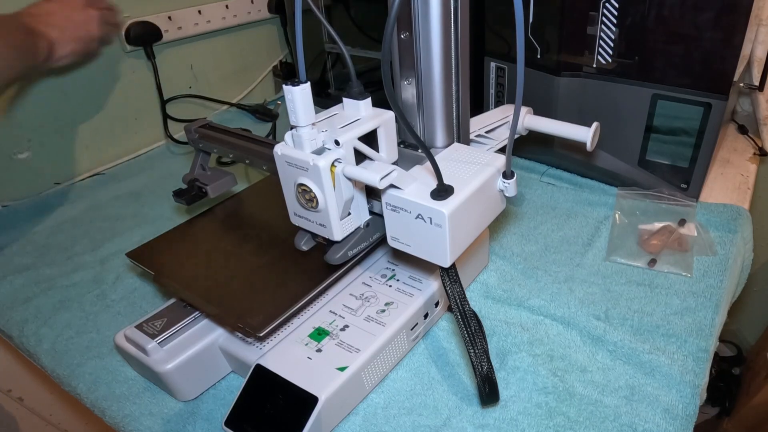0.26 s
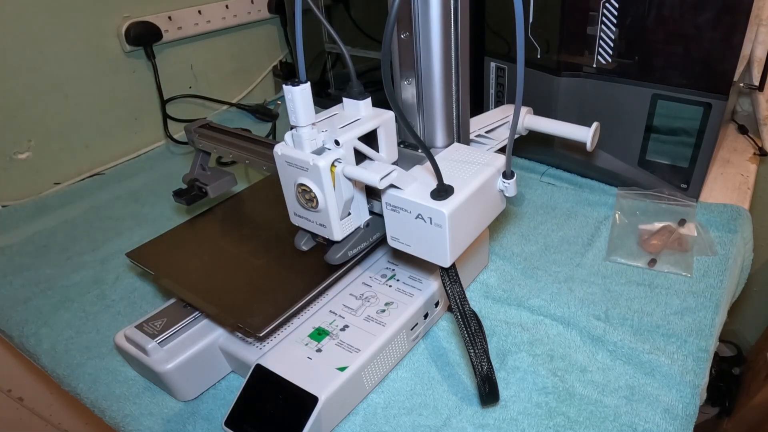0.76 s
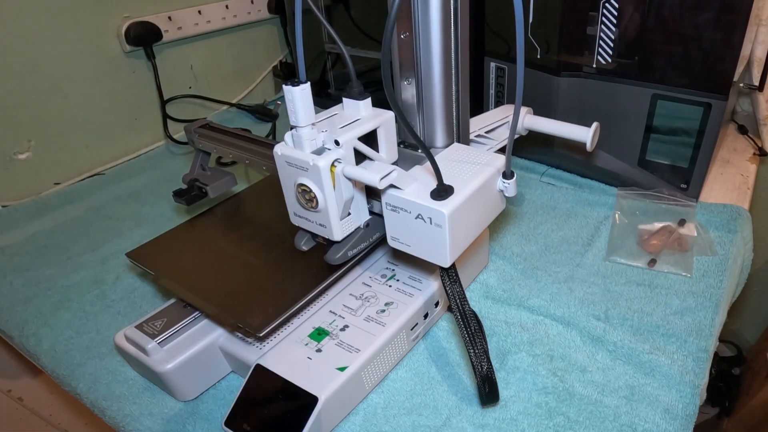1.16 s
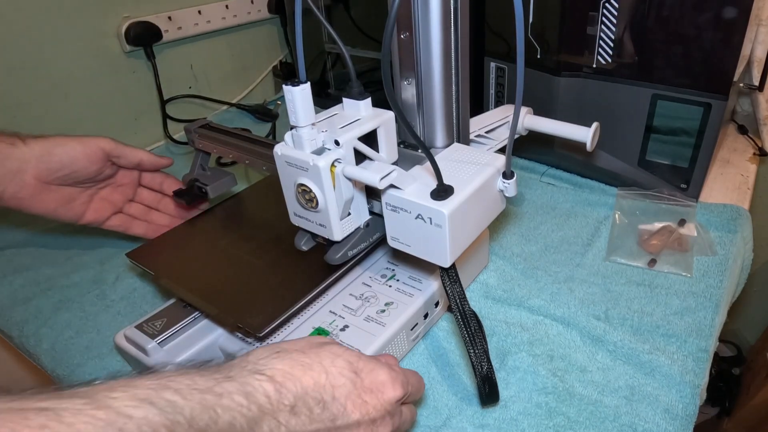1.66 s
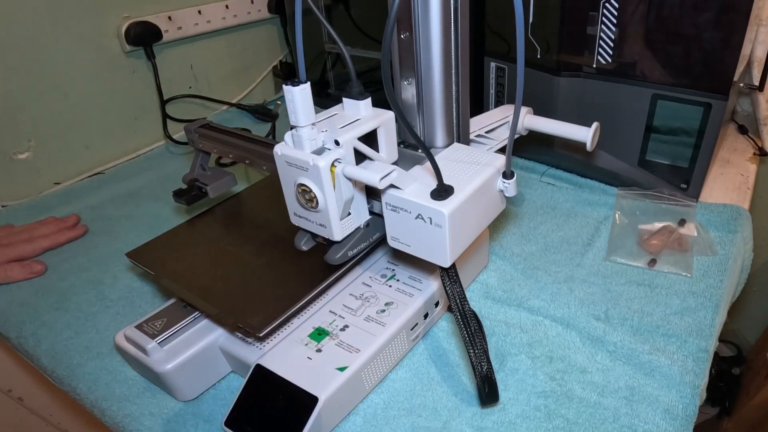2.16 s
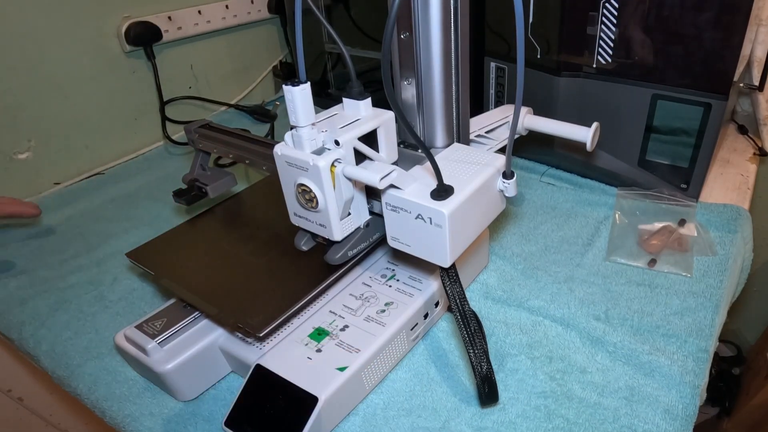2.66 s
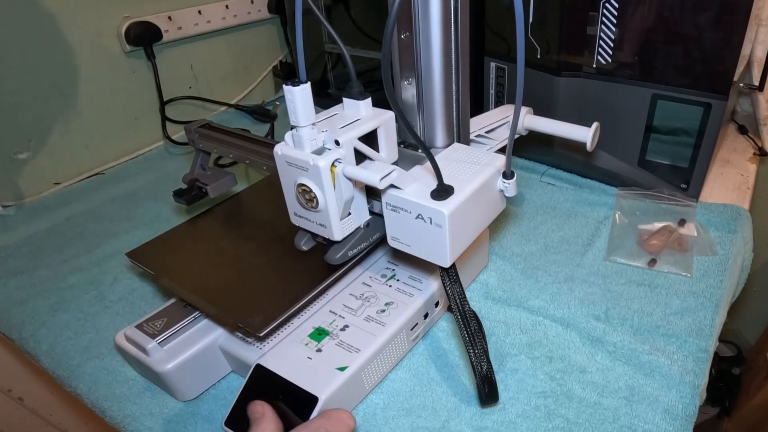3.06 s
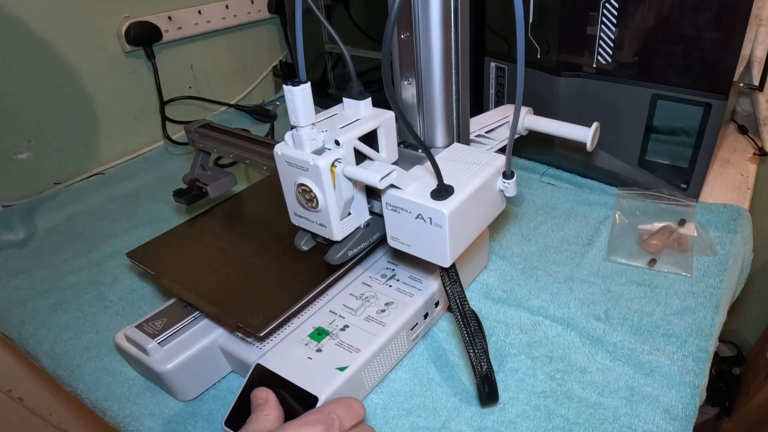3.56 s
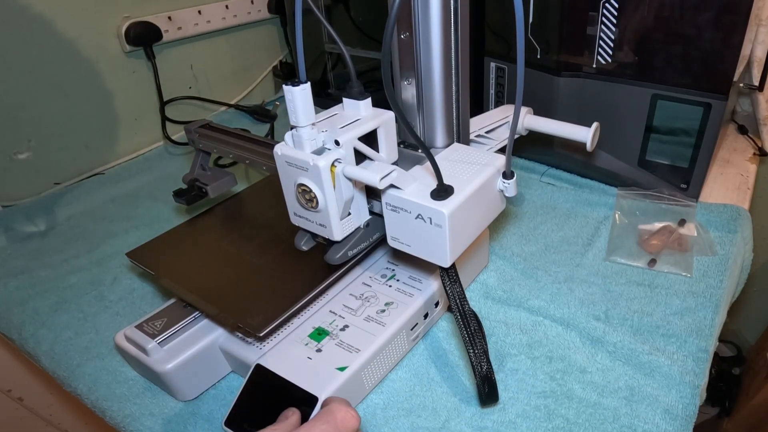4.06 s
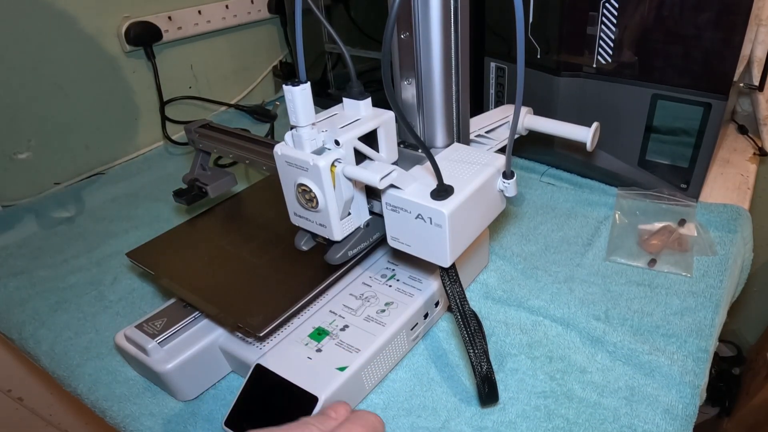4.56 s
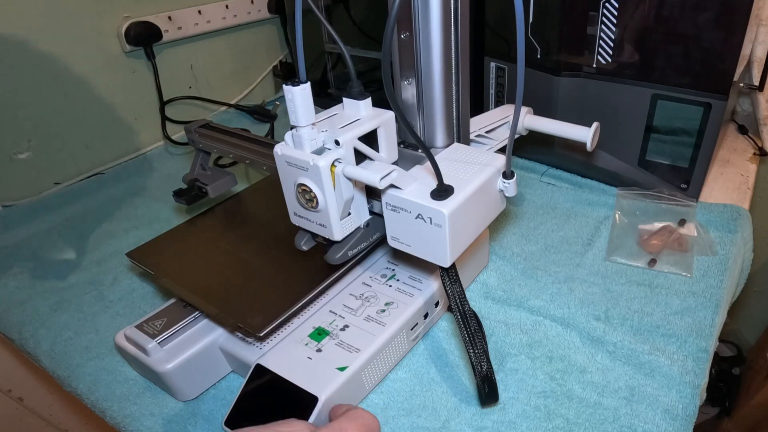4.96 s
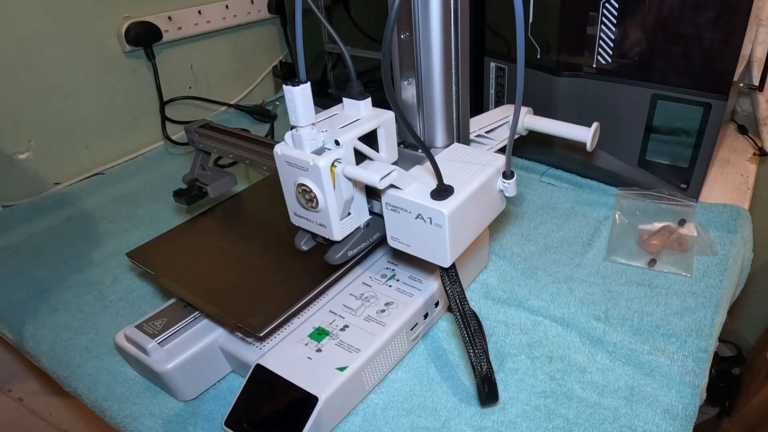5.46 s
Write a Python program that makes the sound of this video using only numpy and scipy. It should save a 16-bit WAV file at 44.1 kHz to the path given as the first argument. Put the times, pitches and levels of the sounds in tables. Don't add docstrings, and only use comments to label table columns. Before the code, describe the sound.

Close stereo sound at a workbench: first a hard metallic-plastic click from the left, fading in a fraction of a second. Then small sleeve rustles, a thin cable scrape and a clattering knock as the cable falls. After two seconds come crisp towel rubs, followed by dull little taps, squeaky skin drags and light scrapes on hollow plastic, over faint low hum.

```python
import sys
import numpy as np
from scipy import signal
from scipy.fft import rfft, irfft, next_fast_len
from scipy.io import wavfile
from scipy.ndimage import uniform_filter1d, map_coordinates

SR = 44100
rng = np.random.default_rng(int(sys.argv[2]) if len(sys.argv) > 2 else 0)


def pcm_store(signal):
    levels = np.round(np.clip(np.atleast_2d(signal), -1, 1) * 32767)
    wavfile.write(sys.argv[1], SR, levels.astype(np.int16).T)


def amplitude_ratio(level_db):
    exponent = np.asarray(level_db, float) / 20
    return 10 ** exponent


N = 251644

# pitch_hz, level_db
MIC_TONE = [(11000, -1), (13500, -2.5), (15000, -4.5), (15600, -7), (15900, -41.5)]
# pitch_hz, level_db
WIDER_TREBLE = [(8000, 0.5), (11000, 3), (14000, 7.5)]
HALVES = np.array([[0.5], [-0.5]])
LEFT_LAG = 1

# pitch_hz, level_db (per Hz)
SNAP_TONE = [(180, -51), (300, -19.5), (975, -17), (1910, -4.5), (3120, -12), (5350, -3.5), (10500, -14),
             (12100, -12), (15000, -34)]
# start_s, pitch_hz, level_db, half_length_s
SPRING_CATCHES = [
    (.0008, 6250, -12, .0005),
    (.0017, 2120, -16, .0011),
    (.0019, 4650, -15, .0007),
    (.0038, 5300, -14.5, .0011),
    (.0043, 7000, -19, .0008),
]
# pitch_hz, level_db (per Hz)
STRIP_TONE = [(160, -37.5), (280, -8.5), (560, -1.5), (813, -12.5), (1250, -0.5), (1360, -11.5), (1460, -5),
              (1720, -6.5), (1900, -1), (2650, -9.5), (3700, -3.5), (9410, -16), (11800, -25), (14200, -33),
              (14500, -41.5), (15400, -60)]
# pitch_hz, fade_s
STRIP_FADE = [(60, 0.6), (180, 0.33), (500, 0.26), (1300, 0.23), (3000, 0.22), (6000, 0.24), (8500, 0.2),
              (10000, 0.16), (12500, 0.18), (14500, 0.16)]
# pitch_hz, level_db, fade_s
STRIP_NOTES = [(186.3, 5, 0.17), (219, -12.5, 0.12), (338, -3, 0.15), (457.5, -7, 0.3), (663.7, -10, .15),
               (992, -10.5, 0.36), (1217, -10, 0.14), (1486, -13.5, 0.24), (1890, -11, .12),
               (2777, -17, 0.25), (3368, -18.5, .2), (6150, -15, .15), (7100, -17.5, .15)]
# pitch_hz, unrelated_share
WALL_SPREAD = [(100, .2), (300, .2), (1000, .33), (3000, 0.54), (5000, .3), (9000, .4), (13000, .45)]
# pitch_hz, left_over_right_db
PLUG_LEFT = [(150, 0.5), (350, 0), (700, 1.5), (8000, 3), (13000, 3.5)]
# pitch_hz, left_lead_radians
PLUG_TURN = [(0, 0), (1200, 0), (2200, -0.14), (3010, -0.84), (4820, -0.14), (7840, -0.3), (8790, 1.5),
             (9040, -0.4), (10400, 1.7), (10900, 0.1), (11300, 2), (12100, -7.6), (12700, -1.4),
             (13400, -4), (13800, -0.05), (15600, 0.17)]

# pitch_hz, level_db (per Hz)
HUM_TONE = [(53, -43), (90, -5.5), (118, -8.5), (135, 0), (156, 8.5), (237, 3), (327, -2), (420, -9),
            (520, -15), (680, -38), (1140, -120)]
# pitch_hz, level_db (per Hz)
SWAY_TONE = [(8, -12), (20, -3), (35, -2), (60, -4.5), (90, -16), (140, -50)]
# pitch_hz, level_db (per Hz)
AIR_TONE = [(210, -23.5), (350, -4), (546, -3.5), (867, -9.5), (1030, -5), (1310, -7), (2050, -16),
            (3250, -20), (4120, -24.5), (5490, -20), (7550, -25), (13000, -38), (15700, -50.5)]
# start_s, low_notes_db, sway_db
WEIGHT_SHIFTS = [(.08, -52, -51), (.22, -58, -64.5), (.55, -90, -64), (0.871, -60, -62), (.93, -63.5, -58),
                 (1.04, -59.5, -69), (1.27, -63.5, -71), (1.34, -67, -79), (1.53, -61, -65.5),
                 (1.84, -66, -73), (2.22, -59.5, -63), (2.42, -79, -79), (2.51, -55, -72), (2.75, -81, -69),
                 (3.11, -66, -63), (3.26, -63, -69), (3.68, -64, -73), (3.8, -60.5, -67),
                 (4.05, -62.5, -93), (4.26, -64, -74), (4.62, -71, -70), (4.97, -63.5, -69.5),
                 (5.08, -68, -69), (5.5, -67.5, -65.5), (5.649, -60, -74.5)]
AIR_DB, HUM_DB, SWAY_REST_DB = -69.5, -67, -80
HUM_LEFT_DB, LEAN_LEFT_DB = -8.5, -3.5
LEAN_HOLD_S = 0.0256
MODES_RISE, MODES_FALL, SWAY_RISE, SWAY_FALL = 200, 174, 120, 230

# start_s, peak_db, pitch_hz
STAND_JOLTS = [(.11, -46, 30), (.86, -62, 40), (.93, -59, 50.3), (1.516, -60, 30), (3.105, -57, 37.6),
               (3.344, -63, 26.8), (3.565, -55.5, 44.8), (3.665, -51, 23.4), (4.603, -55.5, 27),
               (4.65, -56, 70.4), (5.051, -58, 50), (5.158, -60, 42.8)]
JOLT_CYCLES, JOLT_DB = 0.65, -3

# start_s, peak_db, thud_db, rim_db, crack_db
BENCH_KNOCKS = [
    (0.147, -48, -16.5, -7, -22.5),
    (1.0575, -32.5, -12, -18, -16.5),
    (1.071, -43.5, -8.5, -7, -25),
    (1.286, -51, -3.5, -34.5, -19),
    (1.507, -61.5, 6.5, -22.5, -19.5),
    (2.522, -48, 7.5, -8, -16),
    (5.028, -57, 4.5, -23.5, -22),
    (5.533, -41.5, -3.5, -12.5, -30),
    (5.551, -44, -4.5, -22, -33.5),
]
# pitch_hz, width_hz, level_db
BENCH_TOP = [(550, 267, 2.5), (900, 640, 2.5), (1282, 493, 2.5)]
# pitch_hz, width_hz, level_db
BENCH_RIM = [(1690, 560, 13), (2500, 980, 6.5)]
# pitch_hz, width_hz, level_db
LOW_THUD = [(136.7, 18, -0.5), (195.7, 33, 4), (210.5, 42, 3.5), (291.3, 62.5, 0), (442, 91, -5)]
# pitch_hz, level_db, fade_s
PLATE_NOTES = [(586, -7, 0.11), (715, -0.5, 0.11), (894, -3, 0.039), (1060, -19, 0.28), (1320, -29, 0.44),
               (1410, -21, 0.062), (1480, -7, 0.19)]
# pitch_hz, level_db (against the blow), fade_s
ROOM_BOOM = (183, -12.5, 0.43)
PLATE_DB = -15.5
KNOCK_T60_S, HARD_DB, LONGER_S_PER_DB = 0.192, -30.5, 0.03

# start_s, peak_db,
# pitch_hz, crack_db, fade_s
SHORT_TAPS = [(0.147, -42, 2430, -21, 0.04), (.148, -44, 1200, -22, .05), (0.2227, -47, 1490, 3.5, 0.027),
              (0.226, -50, 2700, -7, 0.036), (1.048, -51, 865, -30, .06), (1.0585, -33, 870, -26, 0.044),
              (1.0605, -33.5, 530, -32, 0.056), (1.068, -34, 1160, -40, 0.051),
              (1.073, -29.5, 900, -40, 0.14), (1.084, -40.5, 695, -40, .06), (1.099, -36, 960, -40, 0.063),
              (1.108, -40, 1090, -40, 0.071), (1.113, -44, 720, -40, .08), (1.509, -55, 950, -30, .03),
              (2.79, -69, 532, 6.5, 0.035), (3.002, -52, 1350, -34, 0.035), (3.093, -40, 1040, -23, 0.05),
              (3.0935, -43, 2280, -15, 0.039), (3.094, -46, 4230, -12, .025), (3.135, -38, 840, -23, 0.05),
              (3.1355, -50, 2000, -20, .02), (3.1405, -40, 900, -30, 0.026),
              (3.152, -54.5, 2900, -10, .06), (3.317, -44, 2700, -3, .05), (3.151, -38, 1460, -11, 0.062),
              (3.155, -40, 1430, -20, 0.056), (3.476, -49, 1400, -29.5, 0.031),
              (3.65, -49.5, 990, -5, 0.054), (3.679, -53, 1340, -26, 0.03), (3.696, -50.5, 543, -18, 0.28),
              (3.765, -45.5, 534, -32, 0.15), (3.799, -44, 1430, -2, 0.042),
              (4.077, -50, 1360, -18, 0.086), (4.476, -52, 1430, -21, 0.05),
              (4.591, -47, 1010, -22, 0.075), (4.667, -50.5, 2460, -20, 0.033),
              (4.919, -44, 1440, -7.5, 0.036), (5.017, -40, 950, -4, 0.054),
              (5.018, -43, 2500, -20, 0.058), (5.019, -45, 3730, -10, .05),
              (5.537, -64, 2880, -20.5, 0.12), (4.49, -55, 3200, -20, .08)]
# start_s, peak_db, pitch_hz
SOFT_CATCHES = [(.24, -47, 1100), (1.118, -43, 1040), (1.131, -45, 970), (3.014, -49, 1290),
                (3.021, -52, 1350), (3.033, -51, 1400), (3.04, -47, 1450), (3.053, -48, 1500),
                (3.061, -49, 1010), (3.069, -52, 1350), (3.168, -45, 1400), (3.175, -50, 1400),
                (3.214, -53, 1050), (3.244, -48, 1000), (3.258, -40, 1000), (3.28, -45, 990),
                (3.304, -45, 1300), (3.31, -38, 950), (3.314, -39, 1054), (3.326, -49, 1020),
                (3.345, -52, 1400), (3.159, -49, 1400), (3.181, -47, 1000), (3.199, -45, 950),
                (3.222, -42, 940), (3.234, -47, 930), (3.252, -49, 980), (3.266, -41, 960),
                (3.294, -43, 980), (3.318, -38.5, 980), (3.514, -63, 1290), (3.55, -52, 1460),
                (3.576, -52, 1320), (3.592, -49, 1320), (3.707, -50, 900), (3.72, -54, 1000),
                (3.744, -51, 1060), (3.778, -46, 950), (3.757, -43, 970), (3.77, -40, 990),
                (3.805, -47, 1420), (3.822, -47, 1400), (4.287, -54, 1320), (4.326, -59, 1340),
                (4.452, -64, 1130), (4.486, -49, 1450), (4.495, -55, 1400), (4.504, -49, 1410),
                (4.514, -46, 1470), (4.641, -58, 1190), (4.816, -58, 1480), (4.936, -56, 1250),
                (4.956, -50, 1370), (4.989, -53, 1400), (5, -45, 1420)]
# start_s, level_db, pitch_hz, fade_s
CABLE_SQUEAK = (.478, -53, 2420, .11)
CATCH_CRACK_DB, CATCH_T60_S = -30, 0.063
TAP_RISE_S, CATCH_RISE_S = 0.0005, 0.0015

# start_s, hold_s, hiss_db, dull_db, bench_top_db
CLOTH_STROKES = [(0.163, 0.0075, -94, -68, -74), (0.236, 0.024, -71, -60, -61.5),
                 (0.389, 0.015, -64.5, -59.5, -65.5), (0.58, 0.095, -69.5, -68, -73.5),
                 (0.702, 0.18, -77.5, -70.5, -70.5), (0.944, 0.17, -71.5, -65, -68),
                 (1.14, 0.11, -81.5, -75.5, -74), (1.345, 0.17, -81.5, -82.5, -78.5),
                 (1.544, 0.2, -82.5, -73.5, -74), (1.784, 0.13, -74, -65.5, -68.5),
                 (1.94, 0.005, -73, -74, -88), (2.212, 0.025, -53.5, -64, -80.5),
                 (2.241, 0.042, -54.5, -58.5, -60), (2.292, 0.03, -55.5, -61, -63.5),
                 (2.32, 0.024, -53.5, -55.5, -59.5), (2.352, 0.019, -56.5, -57.5, -66),
                 (2.387, 0.025, -79, -65.5, -65.5), (2.456, 0.031, -57, -59.5, -68),
                 (2.497, 0.052, -50, -56.5, -62), (2.551, 0.024, -59, -62, -63),
                 (2.598, 0.032, -60.5, -67, -71.5), (2.792, 0.0058, -85, -97, -96)]
# start_s, hold_s, hiss_db, upper_db, lower_db
CASING_SLIDES = [(3.019, 0.016, -74.5, -59, -82), (3.039, 0.071, -69.5, -63, -67.5),
                 (3.147, 0.021, -65.5, -52.5, -55), (3.19, 0.038, -62.5, -61, -62),
                 (3.246, 0.041, -60, -72, -57.5), (3.304, 0.015, -57, -52.5, -56.5),
                 (3.472, 0.067, -85.5, -71, -91), (3.56, 0.06, -76, -63.5, -77),
                 (3.67, 0.088, -78.5, -64.5, -67), (3.754, 0.022, -57.5, -63, -58),
                 (3.796, 0.009, -65, -56.5, -62), (3.841, 0.035, -68, -81, -88),
                 (4.086, 0.012, -89, -77.5, -72.5), (4.185, 0.21, -92, -76, -80.5),
                 (4.336, 0.05, -75.5, -66.5, -75), (4.47, 0.037, -71, -60, -72.5),
                 (4.597, 0.022, -73, -64.5, -65), (4.619, .025, -66.5, -68, -74),
                 (4.656, 0.017, -65.5, -60.5, -68), (4.806, 0.04, -83.5, -68.5, -90),
                 (4.934, 0.0072, -80, -62.5, -76), (4.96, .03, -75, -58.5, -71),
                 (4.99, 0.011, -67, -54.5, -69), (5.006, 0.0079, -64.5, -55, -56.5),
                 (5.197, 0.38, -86.5, -80, -85), (5.624, .09, -82, -75, -75.5)]
# pitch_hz, level_db (per Hz)
TOWEL_HISS = [(2650, -32), (4500, -2.5), (6200, 0.5), (7670, -0.5), (9760, -8.5), (10400, -13.5),
              (14400, -26.5), (15700, -46.5)]
# pitch_hz, level_db (per Hz)
PLASTIC_HISS = [(2650, -20), (4500, -4), (5400, -1.5), (6800, -4.5), (7430, -3.5), (9500, -9),
                (11100, -17.5), (13800, -26), (15700, -37.5)]
# pitch_hz, level_db (per Hz)
SLEEVE_RUSTLE = [(940, -40), (1600, -7.5), (1820, -2.5), (2030, -3.5), (2220, -3), (2750, -4.5), (3140, -7),
                 (4500, -11.5), (5850, -12.5), (9900, -120)]
# pitch_hz, level_db (per Hz)
DULL_RUB = [(1200, -13), (1800, 2.5), (2600, 3), (4000, 2), (5200, -20), (7000, -42)]
# pitch_hz, width_hz, level_db
PALM_BODY = [(1100, 400, -0.5), (1590, 670, -1.5)]
# pitch_hz, width_hz, level_db
CASING_UPPER = [(1190, 550, -1.2), (1400, 750, -0.98)]
# pitch_hz, width_hz, level_db
CASING_LOWER = [(930, 1860, 0)]
# pitch_hz, width_hz, level_db
CASING_HOLLOW = [(530, 500, 0)]
# pitch_hz, width_hz, level_db
CASING_PANEL = [(950, 510, 0)]
# pitch_hz, width_hz, level_db
CASING_RIBS = [(2600, 200, -5), (3310, 310, 3), (4050, 370, 1), (4920, 360, 3.5), (5600, 320, 0.5),
               (7300, 410, 1.5), (8540, 440, -5), (9450, 700, 1.5)]
REACH_S, TOUCH_S = 2.1, 2.9
STROKE_RISE, STROKE_FALL, SLIDE_RISE, SLIDE_FALL = 500, 330, 470, 344
CASING_RISE, CASING_FALL = 850, 396
IDLE_HISS_DB, IDLE_CASING_DB = -89, -88
SLEEVE_LEFT_DB, PALM_LEFT_DB, FINGER_LEFT_DB, CASING_LEFT_DB = 4.5, 2, 2, -1.5
PALM_LOW_DB = -7
WIDE_UNDER_DB, HOLLOW_UNDER_DB = -3, -7.5
RIBS_DB = -6
DULL_UNDER_DB, DULL_SHARE = -2.5, 0.93
DULL_LAG_S, DULL_FALL = 0.0065, 210
LINGER_DB, LINGER_SHARE = -14.5, 0.39

# start_s, peak_db, pitch_hz, fade_s
BENCH_THUMPS = [(0.22, -52, 520, 0.099), (4.996, -47.5, 331, 0.17), (1.4, -46, 198, 0.14),
                (1.512, -51, 202, 0.08), (1.2, -48, 233, 0.045), (1.3, -42, 285, 0.075),
                (1.318, -49, 165, 0.15), (1.345, -50, 201, 0.095), (3.2, -51, 150, .1), (5.1, -54, 220, .15),
                (2.3, -44, 226, 0.19), (2.526, -57, 440, 0.1), (3.62, -54, 186, 0.17),
                (5.03, -58, 317, 0.16), (5.56, -56, 380, .2)]

# start_s, hold_s, level_db
SKIN_FLICKS = [
    (0.226, .004, -83),
    (2.188, .04, -63),
    (3.553, .04, -86),
    (3.734, 0.047, -62),
    (4.553, 0.0033, -84),
    (4.596, .015, -68.5),
    (4.636, 0.025, -63),
    (4.925, 0.0088, -68),
    (4.964, .025, -79),
]
# pitch_hz, width_hz, level_db
FLICK_SHEEN = [(9000, 1400, 4), (12500, 7200, -7.5)]
FLICK_RISE, FLICK_FALL = 2800, 2500

# start_s, hold_s, level_db
CABLE_DRAGS = [
    (.72, 0.056, -70),
    (.82, 0.073, -73),
    (0.914, 0.11, -67),
]
# pitch_hz, width_hz, level_db
SLACK_RING = [(2000, 110, 0), (2700, 330, -10)]
# start_s, hold_s, level_db
TIGHT_DRAGS = [
    (.97, .08, -69),
]
# pitch_hz, width_hz, level_db
TIGHT_RING = [(2180, 160, -3), (2770, 200, 0)]


def along(points, hz):
    f, v = np.transpose(points)
    return np.interp(np.log(hz + 1), np.log(f + 1), v)


def unit(x):
    return x / np.sqrt(np.mean(x ** 2) + 1e-20)


def wobble(rate):
    knots = rng.standard_normal(int(N * rate / SR) + 4)
    return map_coordinates(knots, [np.arange(N) * rate / SR])


def filtered(x, response):
    m = next_fast_len(x.shape[-1] + 8192)
    spectrum = rfft(x, m) * response(np.fft.rfftfreq(m, 1 / SR))
    return irfft(spectrum, m)[..., :x.shape[-1]]


def shade(points):
    return lambda hz: amplitude_ratio(along(points, hz))


def body(modes):
    def response(f):
        total = 0
        for k, (c, w, db) in enumerate(modes):
            total = total + (-1) ** k * amplitude_ratio(db) * 1j * f * w / (c * c - f * f + 1j * f * w)
        return total
    return response


def steep(modes):
    return lambda hz: body(modes)(hz) ** 2


def tilt(left_over_right_db):
    return amplitude_ratio(left_over_right_db * HALVES)


def late_left(sound):
    return np.array([np.roll(sound[0], LEFT_LAG), sound[1]])


def pair(response, width, size=N, grain_db=0):
    lumps = uniform_filter1d(rng.standard_normal(size), size=9) * 2.7
    raw = rng.standard_normal((2, size)) * amplitude_ratio(grain_db * lumps)
    mid, side = filtered(raw, lambda hz: response(hz) * amplitude_ratio([0 * hz, along(WIDER_TREBLE, hz)]))
    return unit(np.array([mid + width * side, mid - width * side]))


def struck(response, t60, width, blow, size=SR // 3):
    t = np.arange(size) / SR
    mid, side = rng.standard_normal((2, size)) * amplitude_ratio(-60 * t / t60)
    mid[0] += blow
    sound = filtered(np.array([mid + width * side, mid - width * side]), response)
    return sound / np.abs(sound).max()


def gestures(start_s, hold_s, db, rise, fall):
    t = np.arange(0, N, 96)[:, None] / SR
    early = np.maximum(start_s - t, 0)
    late = np.maximum(t - start_s - hold_s, 0)
    dying = amplitude_ratio(-2 * fall * late) + amplitude_ratio(2 * (LINGER_DB - LINGER_SHARE * fall * late))
    power = amplitude_ratio(2 * (db - rise * early)) * dying
    return np.interp(np.arange(N) / SR, t[:, 0], np.sqrt(np.sum(power, axis=1)))


def add(track, s, sound):
    start = round(s * SR)
    track[:, start:start + sound.shape[1]] += sound[:, :N - start]


def plug():
    t = np.arange(SR) / SR
    burst = np.clip(t / 0.0005, 0, 1) * amplitude_ratio(-60 * np.maximum(t - 0.0046, 0) / 0.008)
    snap = amplitude_ratio(-24) * burst * pair(shade(SNAP_TONE), width=0, size=SR)[0]
    for s, f, db, half in SPRING_CATCHES:
        snap = snap + amplitude_ratio(db) * np.exp(-((t - s) / half) ** 2) * np.sin(2 * np.pi * f * t)

    noise = unit(filtered(rng.standard_normal((2, SR)), shade(STRIP_TONE)))
    hz, frames, z = signal.stft(noise, SR, nperseg=512, noverlap=448)
    fading = z * amplitude_ratio(-60 * frames / along(STRIP_FADE, hz)[:, None])
    tail, stray = signal.istft(fading, SR, nperseg=512, noverlap=448)[1][:, :SR]
    ring = sum(amplitude_ratio(db - 60 * t / t60) * np.sin(2 * np.pi * f * t) for f, db, t60 in STRIP_NOTES)

    mid = snap + amplitude_ratio(-20.5) * np.clip(t / 0.0019, 0, 1) * tail
    mid = mid + amplitude_ratio(-27.5) * (1 - np.exp(-t / 0.0062)) * ring
    stray = amplitude_ratio(-19.0) * np.clip(t / 0.012, 0, 1) * stray
    side = filtered(stray, lambda f: along(WALL_SPREAD, f))

    def direction(f):
        return tilt(along(PLUG_LEFT, f)) * np.exp(1j * along(PLUG_TURN, f) * HALVES)
    sound = filtered(np.array([mid + side, mid - side]), direction)
    return np.pad(sound, ((0, 0), (0, N - SR)))


def room():
    s, modes_db, sway_db = np.transpose(WEIGHT_SHIFTS)
    stir = gestures(s, LEAN_HOLD_S, modes_db, MODES_RISE, MODES_FALL) * tilt(LEAN_LEFT_DB)
    steady = amplitude_ratio(HUM_DB) * tilt(HUM_LEFT_DB)
    hum = np.hypot(stir, steady) * amplitude_ratio(1.8 * wobble(14)) * pair(shade(HUM_TONE), width=0.22)
    lean = gestures(s, LEAN_HOLD_S, sway_db, SWAY_RISE, SWAY_FALL) + amplitude_ratio(SWAY_REST_DB)
    sway = lean * amplitude_ratio(1.5 * wobble(9)) * pair(shade(SWAY_TONE), width=0.25)
    air = amplitude_ratio(AIR_DB + 1.3 * wobble(2.7)) * pair(shade(AIR_TONE), width=0.92)
    return hum + sway + air


def jolts():
    track, t = np.zeros((2, N)), np.arange(SR // 4) / SR
    for s, db, hz in STAND_JOLTS:
        u = t * hz / JOLT_CYCLES
        swing = u * np.exp(1 - u) * np.sin(2 * np.pi * hz * t)
        add(track, s, amplitude_ratio(db + JOLT_DB) * np.array([swing, swing]))
    return track


def knocks():
    track, t = np.zeros((2, N)), np.arange(SR // 3) / SR
    boom_hz, boom_db, boom_t60 = ROOM_BOOM
    boom = amplitude_ratio(boom_db - 60 * t / boom_t60) * (1 - np.exp(-t / 0.011)) * np.sin(2 * np.pi * boom_hz * t)
    for s, db, thud_db, rim_db, crack_db in BENCH_KNOCKS:
        t60 = KNOCK_T60_S + LONGER_S_PER_DB * max(db - HARD_DB, 0)
        sound = boom + struck(steep(BENCH_TOP), t60, width=0.35, blow=14)
        sound = sound + amplitude_ratio(thud_db) * struck(steep(LOW_THUD), 1.78 * t60, width=0.31, blow=49.0)
        sound = sound + amplitude_ratio(rim_db) * struck(steep(BENCH_RIM), 1.3 * t60, width=0.55, blow=3.63)
        crack = struck(steep([(4060, 3600, 0)]), 1.2 * t60, width=0.28, blow=3.3)
        sound = sound + amplitude_ratio(crack_db) * crack
        for hz, level, life in PLATE_NOTES:
            note_db = level + PLATE_DB + rng.normal(0, 3)
            sound = sound + amplitude_ratio(note_db - 60 * t / life) * np.sin(2 * np.pi * hz * t)
        add(track, s, amplitude_ratio(db + 3.5) * sound)
    return track * tilt(2.4)


def taps():
    track, size = np.zeros((2, N)), SR // 6
    t = np.arange(size) / SR
    rows = [(*row, TAP_RISE_S) for row in SHORT_TAPS]
    rows += [(*row, CATCH_CRACK_DB, CATCH_T60_S, CATCH_RISE_S) for row in SOFT_CATCHES]
    for s, db, hz, crack_db, t60, rise_s in rows:
        ring = struck(steep([(hz, 0.24 * hz, 0)]), t60, width=0.25, blow=22, size=size)
        tick_body = steep([(4160, 2500, 1), (9400, 4600, -5)])
        crack = struck(tick_body, t60, width=0.2, blow=2.2, size=size)
        add(track, s, amplitude_ratio(db) * late_left(ring + amplitude_ratio(crack_db) * crack) * (1 - np.exp(-t / rise_s)))
    s, db, hz, t60 = CABLE_SQUEAK
    add(track, s, amplitude_ratio(db) * struck(steep([(hz, 300, 0)]), t60, width=0.3, blow=12))
    return track


def rubbing_skin(t):
    s, hold, *levels = np.transpose(CLOTH_STROKES)
    cloth_hiss, cloth_dull = (gestures(s, hold, db, STROKE_RISE, STROKE_FALL) for db in levels[:2])
    s, hold, hiss_db, high_db, low_db = np.transpose(CASING_SLIDES)
    slide_hiss = gestures(s, hold, hiss_db, SLIDE_RISE, SLIDE_FALL)
    rub_db = DULL_UNDER_DB + DULL_SHARE * hiss_db + (1 - DULL_SHARE) * np.maximum(high_db, low_db)
    slide_dull = gestures(s + DULL_LAG_S, hold, rub_db, SLIDE_RISE, DULL_FALL)

    towel = pair(shade(TOWEL_HISS), width=0.28, grain_db=2)
    plastic = pair(shade(PLASTIC_HISS), width=0.24, grain_db=3.0)
    sleeve = pair(shade(SLEEVE_RUSTLE), width=0.46, grain_db=1)
    rub = pair(shade(DULL_RUB), width=0.47, grain_db=-3.0)
    skin = (cloth_hiss + slide_hiss + amplitude_ratio(IDLE_HISS_DB)) * np.where(t < TOUCH_S, towel, plastic)
    skin = skin + (cloth_dull + slide_dull) * np.where(t < REACH_S, sleeve, rub)
    skin = skin + amplitude_ratio(RIBS_DB) * slide_hiss * pair(steep(CASING_RIBS), width=0.18, grain_db=-1)
    left_db = np.select([t < REACH_S, t < TOUCH_S], [SLEEVE_LEFT_DB, PALM_LEFT_DB], FINGER_LEFT_DB)
    return skin * tilt(left_db)


def rubbed_body(t):
    s, hold, _, _, bench_db = np.transpose(CLOTH_STROKES)
    bench = gestures(s, hold, bench_db, STROKE_RISE, STROKE_FALL)
    s, hold, _, high_db, low_db = np.transpose(CASING_SLIDES)
    high, low = (gestures(s, hold, db, CASING_RISE, CASING_FALL) for db in (high_db, low_db))

    palm = pair(steep(PALM_BODY), width=0.6)
    upper = pair(steep(CASING_UPPER), width=0.31, grain_db=3)
    sound = (bench + high + amplitude_ratio(IDLE_CASING_DB)) * np.where(t < TOUCH_S, palm, upper)
    skirt = amplitude_ratio(PALM_LOW_DB) * bench + amplitude_ratio(WIDE_UNDER_DB) * low
    sound = sound + skirt * pair(steep(CASING_LOWER), width=0.31, grain_db=4.0)
    sound = sound + amplitude_ratio(HOLLOW_UNDER_DB) * low * pair(steep(CASING_HOLLOW), width=0.18, grain_db=5.0)
    sound = sound + low * pair(steep(CASING_PANEL), width=0.28, grain_db=3)
    return late_left(sound) * tilt(CASING_LEFT_DB)


def hands():
    t = np.arange(N) / SR
    shudder = wobble(45)
    sound = amplitude_ratio(1.1 * shudder) * rubbing_skin(t)
    sound = sound + amplitude_ratio(0.26 * shudder + 0.77 * wobble(70)) * rubbed_body(t)
    return np.clip(t / 0.15, 0, 1) * sound


def thumps():
    track, t = np.zeros((2, N)), np.arange(SR // 3) / SR
    for s, db, hz, t60 in BENCH_THUMPS:
        note = amplitude_ratio(db - 60 * t / t60) * (1 - np.exp(-t / 0.003)) * np.sin(2 * np.pi * hz * t)
        add(track, s, note * amplitude_ratio([[-1], [1.2]]))
    return track


def flicks():
    s, hold, db = np.transpose(SKIN_FLICKS)
    sheen = pair(steep(FLICK_SHEEN), width=0.23, grain_db=5)
    return gestures(s, hold, db, FLICK_RISE, FLICK_FALL) * sheen * tilt(2)


def cable():
    slack = gestures(*np.transpose(CABLE_DRAGS), STROKE_RISE, STROKE_FALL)
    tight = gestures(*np.transpose(TIGHT_DRAGS), STROKE_RISE, STROKE_FALL)
    sound = slack * pair(steep(SLACK_RING), width=0.36)
    sound = sound + tight * pair(steep(TIGHT_RING), width=0.33, grain_db=2)
    return sound * tilt(4)


def scene():
    return plug() + room() + jolts() + knocks() + taps() + hands() + thumps() + flicks() + cable()


def band_limit(x):
    return signal.sosfilt(signal.butter(12, 15990, fs=SR, output="sos"), x)


def record(dry):
    mix = filtered(dry, shade(MIC_TONE))
    return band_limit(mix)


dry = scene()
out = record(dry)
pcm_store(out)
```